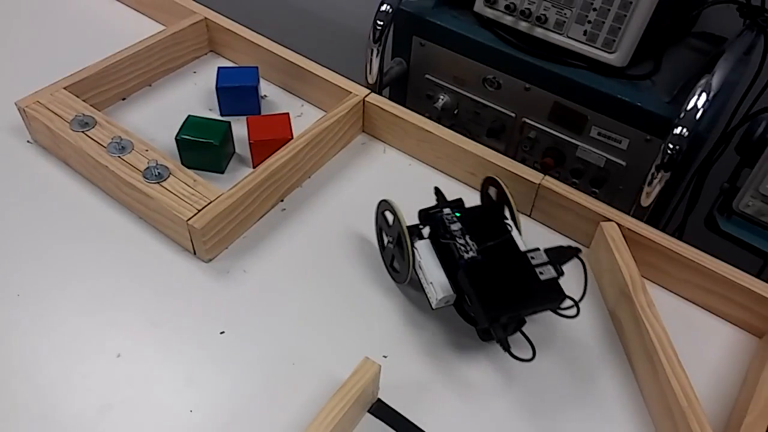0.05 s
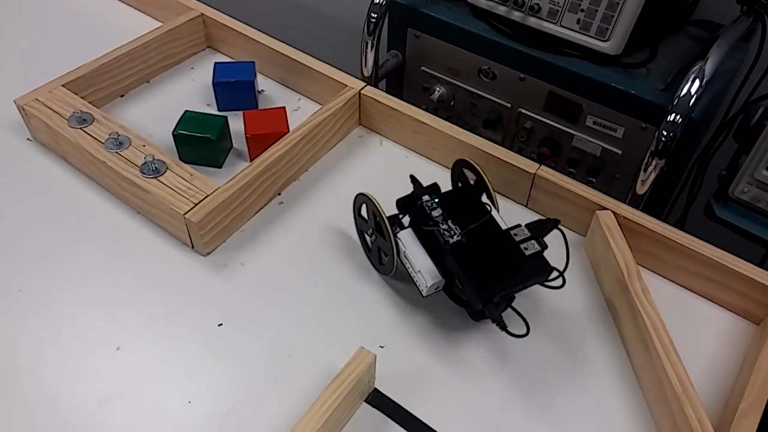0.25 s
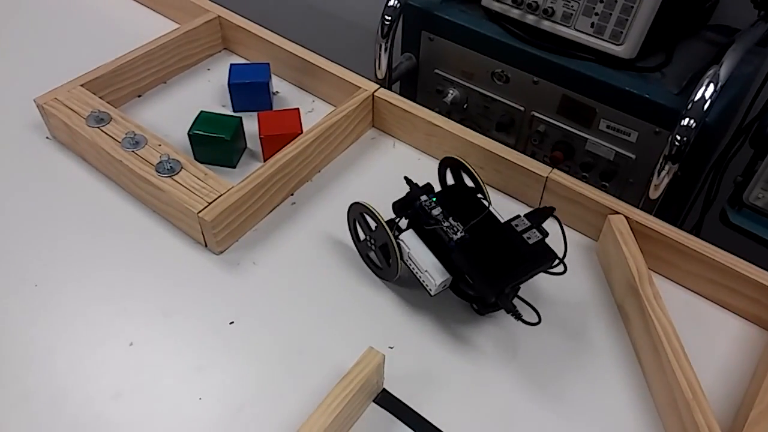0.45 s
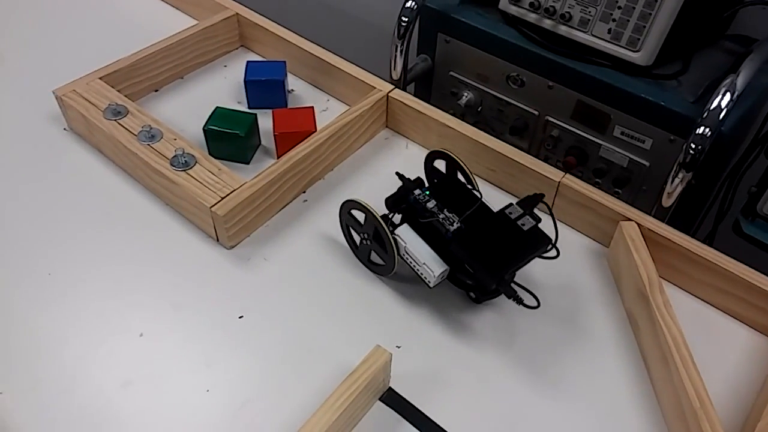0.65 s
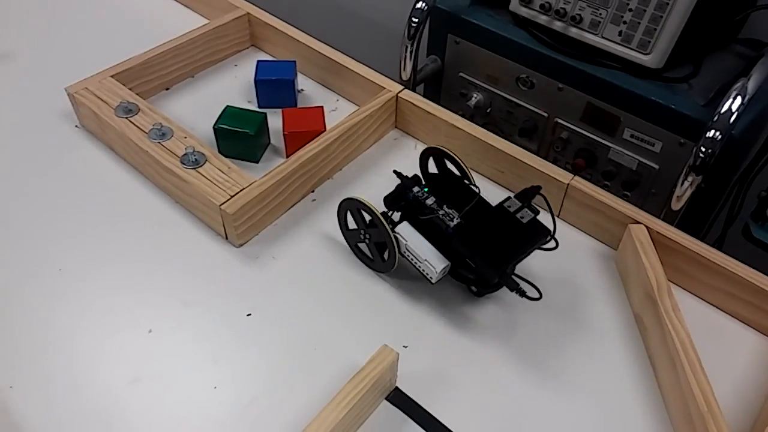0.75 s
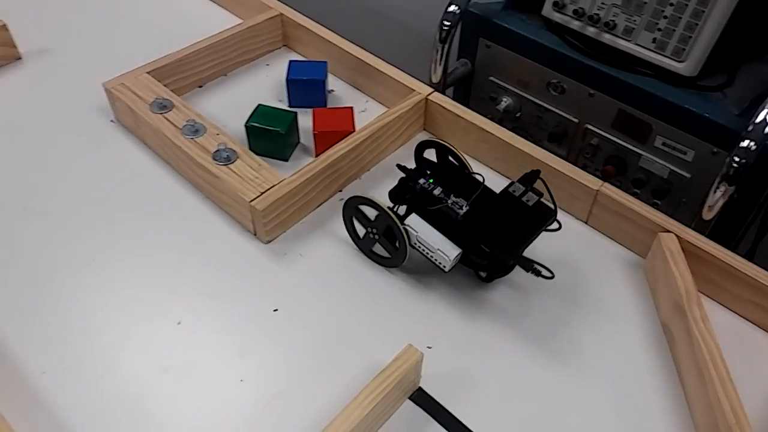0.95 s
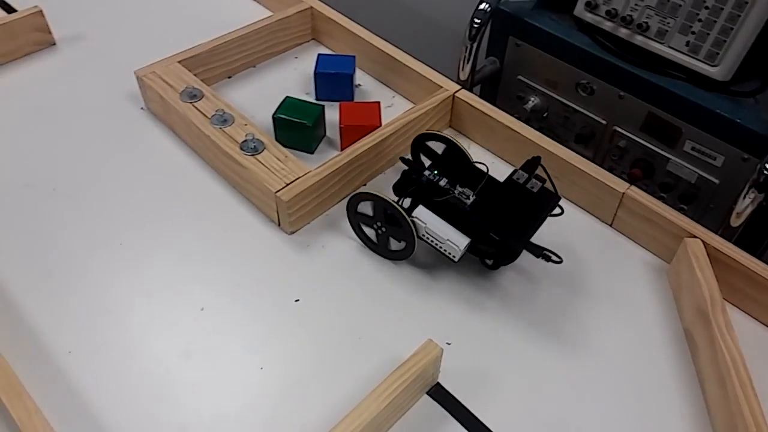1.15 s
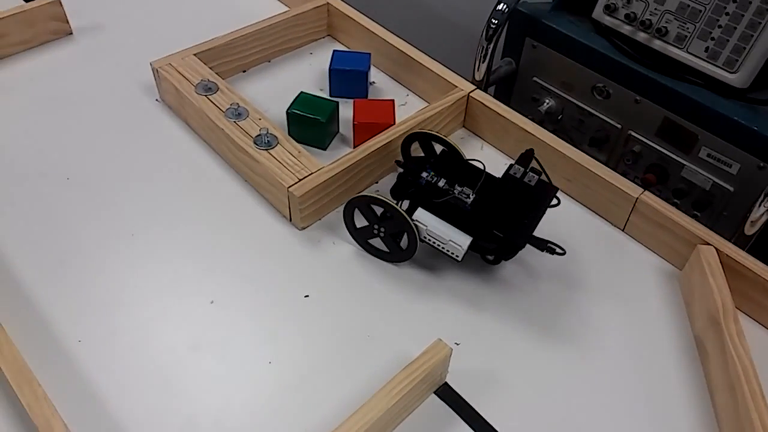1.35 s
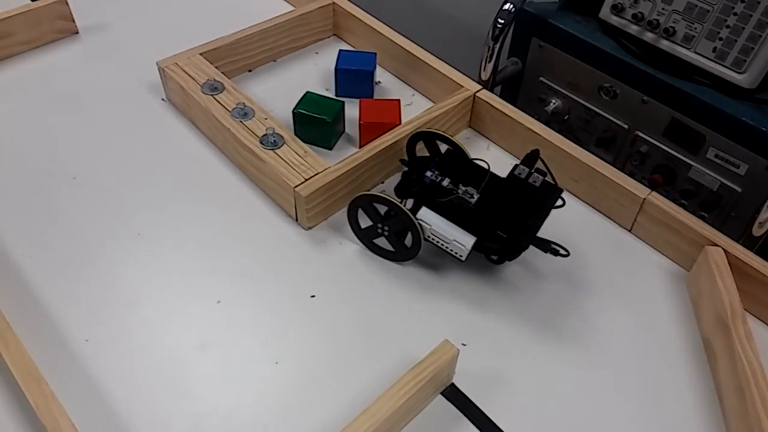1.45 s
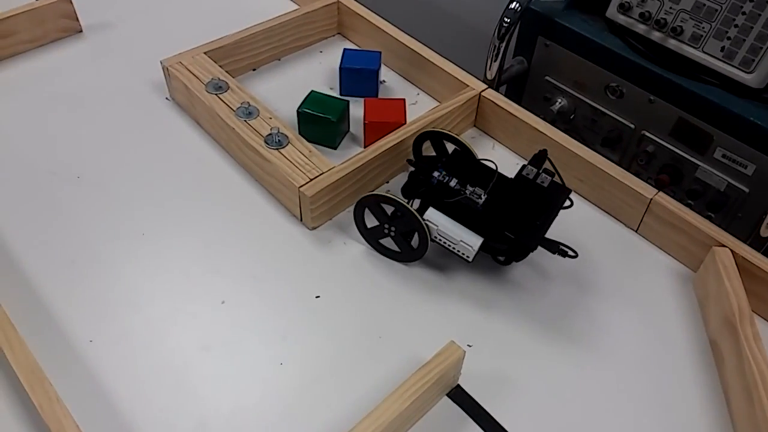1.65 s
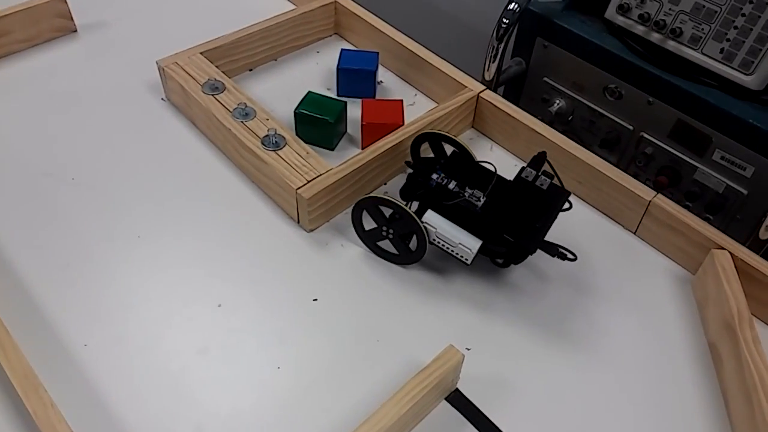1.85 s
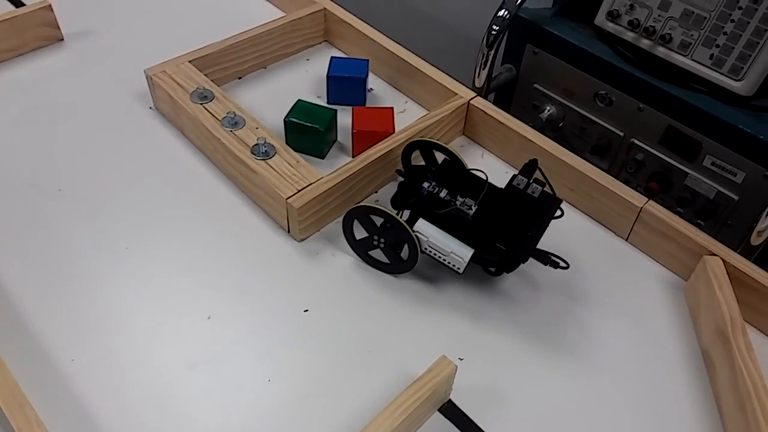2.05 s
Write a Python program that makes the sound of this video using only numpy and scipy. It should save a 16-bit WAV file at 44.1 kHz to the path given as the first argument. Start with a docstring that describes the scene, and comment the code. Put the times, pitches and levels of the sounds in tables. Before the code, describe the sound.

Close up in a small room, a two-wheeled robot judders on a table: buzzing, wavering gears under uneven rapid knocks for a second and a half, then a last knock, slight creaks and quiet air noise.

```python
"""A small two-wheeled robot judders round on a tabletop, close by, in a small room.
Its two gearboxes run up in under 0.1 s to a whine and rasp made of tooth harmonics and tooth-pulsed noise.
About 13 times a second the chassis knocks on the table (thump, ringing modes, crack); the load slows the gears.
The drive stops at 1.5 s; one last knock, creaks of swept sines and a tick follow as the robot settles.
Under it all lie air noise and a thin electric whine, which dip briefly at 1.9 s and sink at the end."""
import sys
import numpy as np
from scipy import signal
from scipy.fft import rfft, irfft
from scipy.io import wavfile

SR = 44100
rng = np.random.default_rng(int(sys.argv[2]) if len(sys.argv) > 2 else 0)


def transcribe(signal):
    """Save signal, clipped to [-1, 1], as a 16-bit WAV file at the path in sys.argv[1]."""
    frames = np.atleast_2d(signal).T
    limited = np.clip(frames, -1, 1)
    pcm = np.round(limited * 32767).astype(np.int16)
    wavfile.write(sys.argv[1], SR, pcm)


N = 92610
T = np.arange(N) / SR

# chassis knocks on the table: start t/s, ring level/dB, upper modes re ring/dB, thump level/dB,
# thump f/Hz, gear slowdown f/Hz
KNOCK_ROWS = [ (.090, -34.5, -14.5, -35, 299, 38), (0.159, -23, -9.5, -25, 300, 121.5),
              (0.231, -12, 8, -8.5, 572, 92.5), (0.2993, -10.5, 5.5, -8.5, 500, 122.5),
              (0.3738, -19.5, -14, -22.5, 300, 112.5), (0.4382, -11, 6, -8, 550, 116),
              (0.5073, -8, 6.5, -7, 600, 173), (0.5822, -13, 3, -13, 526, 185),
              (.662, -10.5, 6, -8.5, 500, 154), (0.7471, -41.5, -9, -34, 399, 67),
              (0.8161, -20, -39.5, -41, 310, 187.5), (0.9235, -28.5, -13, -16.5, 320, 129),
              (0.9882, -13.5, -38, -19, 370, 127), (1.071, -24, -26.5, -25.5, 300, 189.5),
              (1.1452, -13, -2.5, -8, 607, 193.5), (1.233, -22, -8.5, -27, 400, 96),
              (1.3067, -16.5, 0, -8, 499, 42.5), (1.384, -13.5, 0, 0, 757, 117.5),
              (1.4587, -25.5, -28, -16, 576, 58.5), (1.537, -36, 3.5, -27.5, 253, 3)]


def amp(db):
    """Decibels to gain."""
    return 10 ** (np.asarray(db) / 20)


def curve(rows):
    """Join (t/s, value) rows by straight lines."""
    return np.interp(T, *np.array(rows, float).T)


def unit(x):
    """Scale to rms 1."""
    return x / np.sqrt(np.mean(x ** 2))


def colour(x, points):
    """Filter x by (f/Hz, level/dB) points, to rms 1."""
    points_hz, points_db = np.array(points, float).T
    f_hz = np.fft.rfftfreq(N, 1 / SR)
    gain = amp(np.interp(np.log(f_hz + 1), np.log(points_hz), points_db))
    return unit(irfft(rfft(x) * gain, N))


def walk(rate_hz):
    """Smooth random signal, rms 1, Gaussian low-pass near rate_hz."""
    f_hz = np.fft.rfftfreq(N, 1 / SR)
    lowpass = np.exp(-(f_hz / rate_hz) ** 2) * (f_hz > 0)
    return unit(irfft(rfft(rng.standard_normal(N)) * lowpass, N))


def fade(age_s, t60_s):
    """Exponential decay, silent before age 0."""
    return (age_s >= 0) * np.exp(-np.log(1000) * np.maximum(age_s, 0) / t60_s)


def turns(hz):
    """Phase in radians of a varying frequency."""
    return 2 * np.pi * np.cumsum(hz) / SR


def knocks():
    """Each impact gives a short thump, rings the body modes and cracks loose plastic by its hardness."""
    # modes of chassis and table: f/Hz, level/dB, decay t60/s
    body = [(121.2, -30.5, 0.36), (210, -12, 0.051), (270, -20.5, .14), (370.6, -4.5, .105),
            (383.8, -8, .12), (458, -17, 0.16), (511, -29, .15), (633, -14.5, 0.069), (707.6, -18.5, 0.11),
            (798.4, -5.5, 0.05), (900, -21, 0.084), (1040.7, -14.5, 0.096), (1118, -13.5, 0.072),
            (1585, -26, 0.042), (1736, -30, 0.05), (1910, -25.5, 0.039)]
    # crack spectrum: f/Hz, level/dB
    crack_spectrum = [(200, -17), (600, 14), (1150, 6.5), (1500, -14), (2400, -13), (3000, -21.5),
                      (3700, -5.5), (4600, -23.5), (9000, -32), (15000, -45)]
    ring_attack_s, thump_lag_s = 0.002, 0.002
    crack_db, crack_t60_s = -12, 0.084
    upper_from_hz, upper_full_hz = 440, 650

    out, age = np.zeros(N), T[:N // 4]
    crack = colour(rng.standard_normal(N), crack_spectrum)
    rise = 1 - np.exp(-age / ring_attack_s)
    modes = []
    for k, (hz, db, t60_s) in enumerate(body):
        sign = -(-1) ** ((k + 1) // 2)  # after the first mode, successive pairs alternate
        modes.append(sign * amp(db) * rise * fade(age, t60_s) * np.sin(2 * np.pi * hz * age))
    upper_share = np.interp([m[0] for m in body], [upper_from_hz, upper_full_hz], [0, 1])

    for start_s, ring_db, upper_db, thump_db, thump_hz, _ in KNOCK_ROWS:
        first = int(start_s * SR)
        span = slice(first, first + len(age))
        push = (np.pi * thump_hz * (age - thump_lag_s)) ** 2
        thump = amp(thump_db) * (1 - 2 * push) * np.exp(-push)  # Ricker pulse
        ring = amp(ring_db) * (amp(upper_db * upper_share) @ modes)
        # strong upper modes or a high thump mean a hard knock
        thump_hardness = amp(thump_db) * np.interp(thump_hz, [350, 900], [0, 1])
        hardness = amp(ring_db + upper_db) + thump_hardness
        out[span] += ring + thump
        out[span] += hardness * amp(crack_db) * crack[span] * rise * fade(age, crack_t60_s)
    return out


def gears():
    """Two motors slowed by every knock; the slower one binds and slips free; backlash chatters."""
    # tooth rate without the knocks: t/s, f/Hz
    mesh = [(0, 1243), (.07, 1610), (.3, 1641), (.56, 1609), (.65, 1625), (.88, 1610), (.98, 1606),
            (1.28, 1610), (1.37, 1680), (1.5, 1602)]
    # drive level: t/s, level/dB
    drive = [(0, -53), (.015, -35), (.03, -11.5), (.07, -3.5), (.25, -2.5), (.46, -2), (.8, -2.5),
             (1.27, -1.5), (1.482, 0.5), (1.495, -25), (1.55, -60)]
    sag_lag_s, sag_width_s = 0.03, 0.021
    catch_hz, catch_swing = 26, 0.03  # mean rate, speed fraction
    flutter, other_wander = 0.005, 0.018  # rms speed fractions
    other_ratio, other_db = 0.98, -3.5
    chatter_hz, chatter_depth = 53, 0.25  # rate at mean speed

    sag_hz = sum(k[5] * np.exp(-((T - k[0] - sag_lag_s) / sag_width_s) ** 2) for k in KNOCK_ROWS)
    hz = curve(mesh) - sag_hz
    # slows for 85 % of each cycle, then speeds up again
    catch = -signal.sawtooth(turns(catch_hz * (1 + 0.2 * walk(12))), 0.85)
    first = gearbox(hz * (1 + flutter * walk(90)))
    second = gearbox(other_ratio * hz * (1 + other_wander * walk(20) + catch_swing * catch))
    chatter = 1 + chatter_depth * np.sin(turns(chatter_hz * hz / hz.mean()))
    return amp(curve(drive)) * chatter * (first + amp(other_db) * second)


def gearbox(hz):
    """Teeth meeting hz times a second give whine and tooth-pulsed rasp, swelling once a rotor turn."""
    # whine harmonics: multiple of tooth rate, level/dB
    whine_rows = [(2, -68), (3, -55.5), (4, -50.5), (5, -48), (6, -47), (7, -53.5), (8, -50.5), (9, -64.5)]
    # rasp spectrum: f/Hz, level/dB
    rasp_spectrum = [(100, -45), (250, 9), (400, 9.5), (700, 4), (1100, -3), (1700, -13.5), (2800, -8),
                     (3200, -12.5), (3700, -1), (4200, -8), (4800, -4.5), (5400, -3.5), (6300, -1),
                     (7600, 1.5), (8200, -7.5), (9200, -2.5), (10500, -9.5), (12400, -5), (13700, -10.5),
                     (15500, -16)]
    speed_jitter, rotor_swing, pinion_teeth = 0.003, 0.2, 16
    whine_flicker_db, rasp_flicker_db = 2.4, 0.6  # rms
    rasp_db, rasp_grain_db, rasp_buzz = -43.5, 0.5, 0.8

    phase = turns(hz * (1 + speed_jitter * walk(400)))
    whine = np.zeros(N)
    for multiple, db in whine_rows:
        tone = np.sin(round(multiple) * phase + rng.uniform(0, 2 * np.pi))
        whine += amp(db) * unit(amp(whine_flicker_db * walk(60)) * tone)
    grains = rng.standard_normal(N) * amp(rasp_grain_db * walk(1500))
    grains *= 1 + rasp_buzz * np.sin(phase)
    rasp = amp(rasp_db + rasp_flicker_db * walk(50)) * colour(grains, rasp_spectrum)
    return (whine + rasp) * (1 + rotor_swing * np.sin(phase / pinion_teeth))


def creaks_and_ticks():
    """Plastic parts scuff and creak as wavering tones under a half-sine swell; ticks are decaying noise."""
    # scuffs and creaks of wheels and frame: start t/s, length t/s, f/Hz, rms wander f/Hz, level/dB
    creaks = [(0.049, 0.13, 1000, 260, -46), (1.25, 0.031, 945, 170, -34.5), (1.526, 0.18, 778, 156, -49),
              (1.845, 0.035, 4650, 224, -77), (1.574, 0.19, 397.3, 18.2, -45),
              (1.747, 0.073, 370, 31, -46.5), (1.936, .05, 273, 28, -59), (1.975, 0.057, 248, 14, -55)]
    # light plastic ticks: start t/s, level/dB, decay t60/s
    ticks = [(.85, -40, 0.14), (1.108, -45, 0.12), (1.912, -61.5, 0.25)]
    # tick spectrum: f/Hz, level/dB
    tick_spectrum = [(300, -24), (1500, -9), (2200, -12), (2650, 5), (3100, -3), (3500, -5), (3750, 11),
                     (4050, -1), (8000, -21), (15000, -28)]

    out = np.zeros(N)
    tick_noise = colour(rng.standard_normal(N), tick_spectrum)
    for start_s, length_s, hz, wander_hz, db in creaks:
        swell = np.sin(np.pi * np.clip((T - start_s) / length_s, 0, 1))
        out += amp(db) * swell * np.sin(turns(hz + wander_hz * walk(313)))
    for start_s, db, t60_s in ticks:
        out += amp(db) * tick_noise * fade(T - start_s, t60_s)
    return out


def room(x):
    """Diffuse reflections: a noise tail with its own level and decay in each band."""
    # room bands: centre f/Hz, level/dB, decay t60/s
    bands = [(55, -34.5, .5), (125, 0, 0.52), (253, -5.5, 0.69), (500, -9.5, 0.44), (1000, -8.5, 0.34),
             (2000, -7, 0.36), (4000, -6.5, .38), (8000, -18, .3), (14000, -9.5, 0.28)]
    delay_s = 0.006

    noise, f_hz = rfft(rng.standard_normal(N)), np.fft.rfftfreq(N, 1 / SR)
    centres = np.log([b[0] for b in bands])
    tail = np.zeros(N)
    for share, (_, db, t60_s) in zip(np.eye(len(bands)), bands):
        band = irfft(noise * np.interp(np.log(f_hz + 1), centres, share), N)
        decay = fade(T - delay_s, t60_s)
        tail += amp(db) * band * decay / np.sqrt(np.sum(decay ** 2))
    return signal.fftconvolve(x, tail)[:N]


def background():
    """Room air as coloured noise; electronics as a whine and its octave, pulsing in level and pitch."""
    # common level of air and whine: t/s, level/dB
    level = [(0, -5), (.05, 3.5), (1.7, 2.5), (1.8, 1.5), (1.86, -12.5), (1.903, -22), (1.92, -4.5),
             (2.015, -1), (2.05, -13.5), (2.1, -16.5)]
    # air spectrum: f/Hz, level/dB
    air_spectrum = [(30, -21), (120, -5), (400, -6), (900, -11.5), (2500, -21), (5000, -25.5), (10000, -31),
                    (15000, -28.5)]
    # levels ahead of the common level
    air_db, idle_db, idle_octave_db = -63, -74.5, -75.5
    idle_hz, idle_pulse_hz, idle_swing_hz, idle_wander_hz = 7300, 60, 110, 90

    pulse = np.sin(2 * np.pi * idle_pulse_hz * T)
    phase = turns(idle_hz + idle_swing_hz * pulse + idle_wander_hz * walk(600))
    tones = amp(idle_db) * np.sin(phase) + amp(idle_octave_db) * np.sin(2 * phase)
    idle = (1 + pulse) * tones
    air = amp(air_db) * colour(rng.standard_normal(N), air_spectrum)
    return amp(curve(level)) * (idle + air)


def scene():
    """Knocks and gears with room reflections, over dry creaks, ticks and background."""
    robot = knocks() + gears()
    return (robot + room(robot) + creaks_and_ticks() + background())[None]


def record(dry):
    """The recorder thins the deep bass, rounds peaks near its ceiling and cuts the top."""
    low_cut_hz, top_hz, ceiling = 39, 15700, 0.95
    high_pass = signal.butter(1, low_cut_hz, "high", fs=SR, output="sos")
    thin = signal.sosfilt(high_pass, dry)
    held = thin / (1 + (thin / ceiling) ** 10) ** (1 / 10)
    low_pass = signal.ellip(10, 0.2, 80, top_hz, fs=SR, output="sos")
    return signal.sosfilt(low_pass, held)


dry = scene()
out = record(dry)
transcribe(out)
```